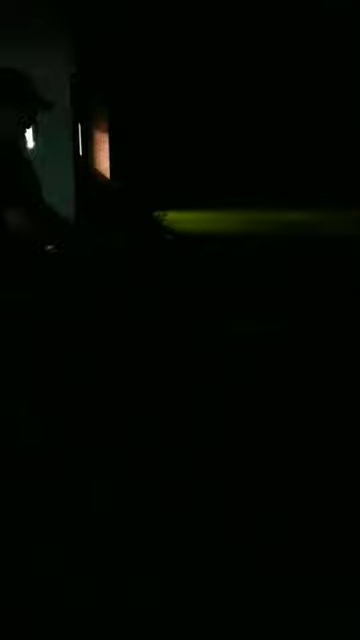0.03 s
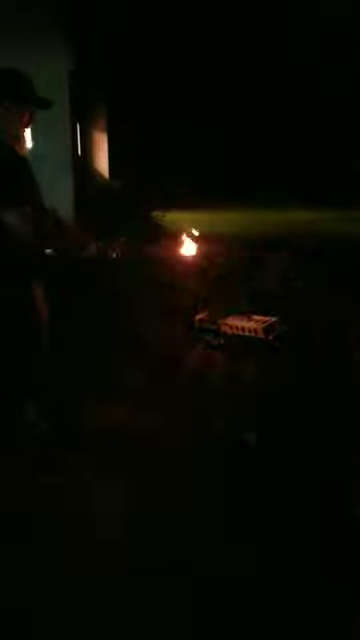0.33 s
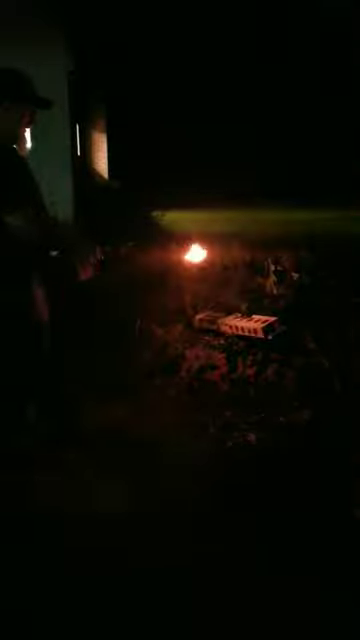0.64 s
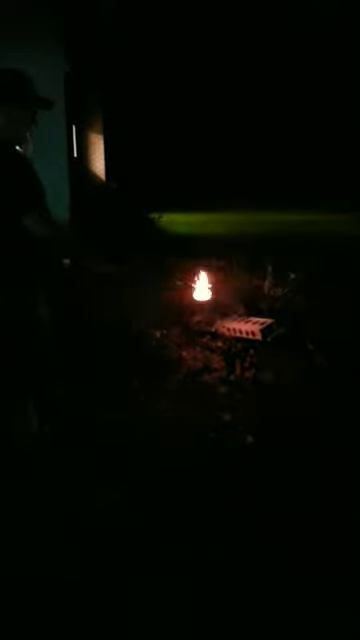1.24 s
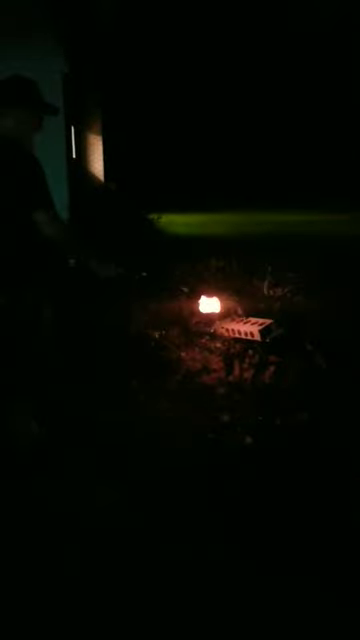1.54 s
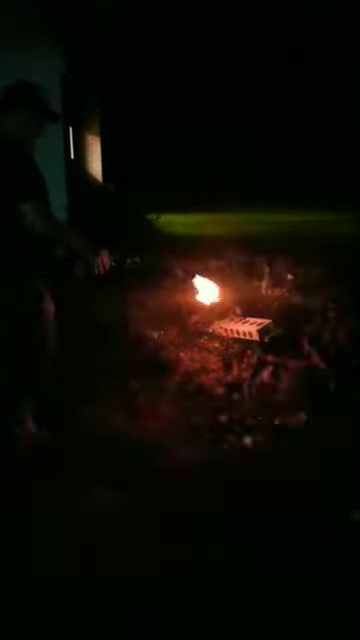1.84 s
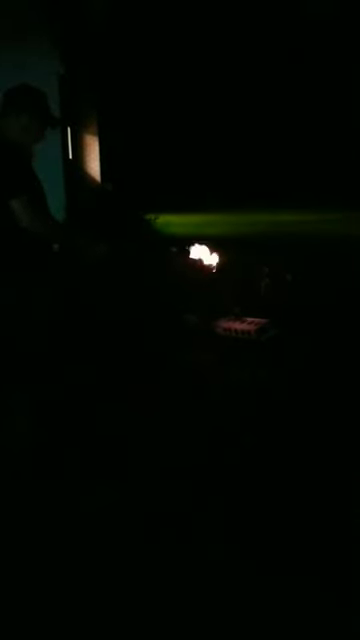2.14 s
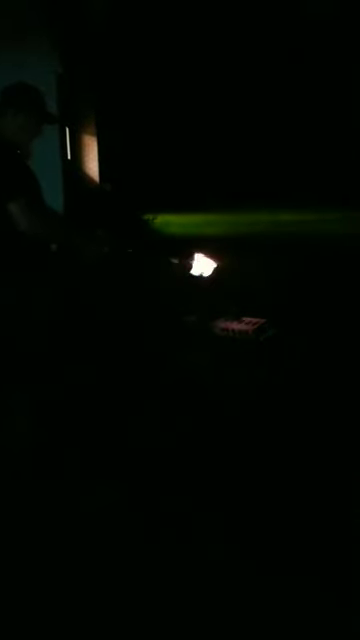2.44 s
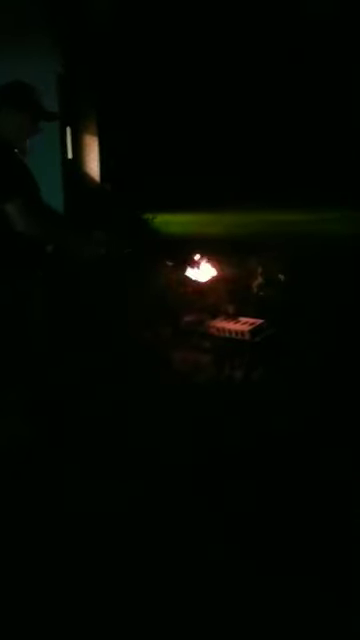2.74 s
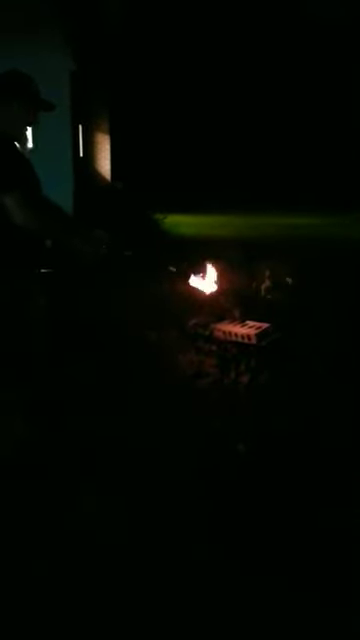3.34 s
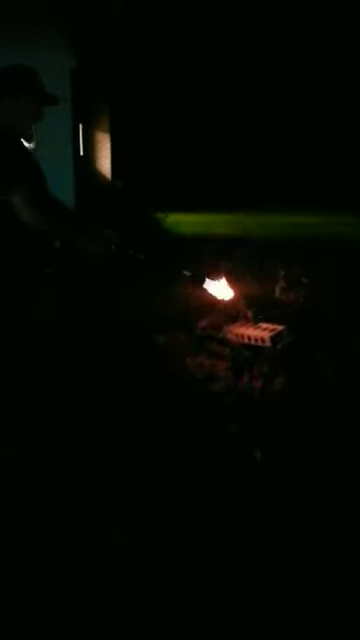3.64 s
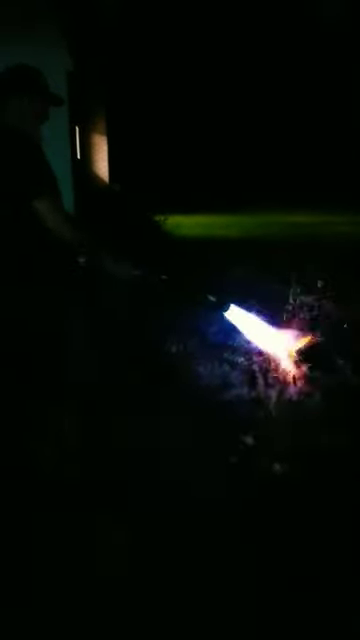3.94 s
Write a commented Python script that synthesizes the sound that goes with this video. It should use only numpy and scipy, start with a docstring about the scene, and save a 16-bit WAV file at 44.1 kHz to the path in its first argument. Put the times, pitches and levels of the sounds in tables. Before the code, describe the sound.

Gas torch snapping alight, hissing quietly and suddenly roaring, while night insects rasp.

```python
"""An igniter snaps, and a propane torch catches with a soft whump, outdoors at night. The small flame
flutters, the gas jet hisses and the burner tube hums at its resonance; a thin whistle creeps in, then
the valve opens and the flame flares into a roar. A katydid rasps two phrases of four strokes, drawing
a file over its resonant wing. A few small ticks sound nearby, over a distant insect chorus and a low
drone."""
import sys
import numpy as np
from scipy import signal
from scipy.fft import rfft, irfft, next_fast_len
from scipy.io import wavfile
from scipy.ndimage import uniform_filter1d, map_coordinates

SR = 44100
rng = np.random.default_rng(int(sys.argv[2]) if len(sys.argv) > 2 else 0)


def digitize_waveform(pressure):
    """Quantize a signal to 16-bit integers and store it at the path in sys.argv[1].

    Rows of a 2-D input are taken as channels; values are limited to [-1, 1].
    """
    field = np.atleast_2d(pressure).T
    bounded = np.clip(field, -1, 1)
    quanta = np.round(bounded * 32767).astype(np.int16)
    wavfile.write(sys.argv[1], SR, quanta)


N = 176400

# Interaural coherence of the loud and the quiet noises: f/Hz, correlation
LOUD_COHERENCE = [(100, .98), (300, .9), (480, .7), (700, .2), (1150, .8), (2400, .35), (5000, .05),
                  (12000, -.1)]
QUIET_COHERENCE = [(100, .98), (400, 0.88), (750, 0.18), (1200, 0.54), (2400, -0.13), (12000, -0.0068)]
# Their interaural level difference: f/Hz, left minus right/dB
LOUD_PAN = [(60, -0.5), (400, -1), (700, -8.5), (1250, -0.5), (2400, -8.5), (4400, -3), (10000, -0.5)]
QUIET_PAN = [(60, -1), (110, 1), (200, -1.5), (380, -3.0), (690, -10), (1280, -6.5), (2370, -8), (4360, -3),
             (8050, -3.5), (14800, 2.5)]
LOUD_FIELD, QUIET_FIELD = (LOUD_COHERENCE, LOUD_PAN), (QUIET_COHERENCE, QUIET_PAN)


def flare(churn_db=1.5, sputter_db=.75, roar_growth=1.18, gas_growth=.88, catch_s=3.837, rise_s=.0026):
    """Turbulent flow sputters and drives the tube resonance; a low roar follows as fresh gas catches."""
    # Flow noise as the valve opens: t/s, level/dB
    opening = [(3.812, -59), (3.832, -37), (3.843, -27), (3.872, -24), (3.94, -21.5), (3.96, -20),
               (4.0, -20)]
    # Spectra: f/Hz, level/dB
    roar_tone = [(25, -39.5), (50, -21), (90, -5), (135, -2), (170, 0.5), (205, -6), (235, -3),
                 (275, -11.5), (430, -7.5), (540, -11.5), (680, -18), (900, -20.5), (1300, -46),
                 (2000, -73)]
    tube_tone = [(500, -15), (930, -12.5), (1030, -0.5), (1100, -4.5), (1172, 2.5), (1230, -6.5),
                 (1320, -3.5), (1550, -17.5), (2500, -35)]
    gas_tone = [(940, -31), (1600, 0), (1730, -3.5), (2030, -1), (2870, -5), (3540, -0.5), (5620, -2),
                (6180, -5), (7250, -5.5), (11700, -4), (15300, -6)]
    flow_db = curve(opening)
    full_db = flow_db.max()
    below_db = flow_db - full_db
    caught = .5 + .5 * np.tanh((clock() - catch_s) / rise_s)
    roar_db = full_db + roar_growth * below_db - .5 + churn_db * wobble(90)
    roar = caught * amp(roar_db) * noise(roar_tone, *LOUD_FIELD)
    tube = amp(flow_db - 3.5 + .65 * wobble(120)) * noise(tube_tone, *LOUD_FIELD)
    gas_db = full_db + gas_growth * below_db - 6.5 + sputter_db * wobble(700)
    gas = amp(gas_db) * noise(gas_tone, *LOUD_FIELD)
    return (roar + tube + echoes(gas, wet_db=-1.5)) * (clock() > opening[0][0])


def idle_flame():
    """Unsteady combustion flutters and excites the tube resonance, while the turbulent jet hisses."""
    # Envelopes: t/s, relative level/dB
    flutter_levels = [(0.28, -60.5), (0.36, -55.5), (0.77, -65), (1.15, -53.5), (1.19, -59.5),
                      (1.87, -58.5), (1.9, -64), (2.32, -60), (2.43, -56), (2.49, -60.5), (2.52, -55.5),
                      (2.97, -56.5), (2.99, -58), (3.78, -57.5)]
    tube_levels = [(0.28, -80), (0.62, -78.5), (0.82, -66), (0.95, -71), (1.06, -68), (1.09, -54),
                   (1.17, -60), (1.29, -69), (1.43, -63), (1.58, -80), (1.82, -73), (2.05, -91.5),
                   (2.32, -81.5), (2.45, -62.5), (2.56, -68.5), (2.68, -62), (3.58, -63), (3.78, -59)]
    jet_levels = [(0.25, -61), (0.6, -63.5), (0.7, -60.5), (0.9, -61.5), (1.05, -62), (1.13, -65),
                  (1.6, -71), (1.8, -67), (2.0, -58), (2.28, -63), (2.4, -64), (2.6, -58.5), (3.2, -62),
                  (3.78, -62)]
    # Spectra: f/Hz, level/dB
    flutter_tone = [(25, -26), (50, -38), (85, -2.5), (130, 0), (200, -3.5), (280, -10.5), (420, -9.5),
                    (560, -18.5), (640, -16), (740, -27), (1500, -50), (4000, -36)]
    tube_tone = [(400, -40), (800, -15.5), (1000, 0), (1170, 5), (1320, -1), (1550, -11.5), (2500, -52)]
    jet_tone = [(1500, -14), (3000, -5.5), (5800, 11.5), (7200, -30), (8600, -9.5), (9600, 6.5), (10500, 0),
                (12600, 0.5), (15200, 0.5)]
    flutter = amp(curve(flutter_levels) + 2 + 1.42 * wobble(21.92)) * noise(flutter_tone, *QUIET_FIELD)
    tube = amp(curve(tube_levels) - 1 + 1.4 * wobble(25.17)) * noise(tube_tone, *QUIET_FIELD)
    jet = amp(curve(jet_levels) + 1 + .83 * wobble(30.36)) * noise(jet_tone, *QUIET_FIELD)
    return flutter + tube + echoes(jet, wet_db=-2)


def ignition(catch_s=.1868, push_hz=125, push_db=-24.5, puff_db=-36, puff_rise_s=.095, puff_t60=.17):
    """The igniter's impact rings the metal's modes; the gas catches and expands in a push and a puff."""
    # Snap and rebound: t/s, level/dB
    snaps = [(.1557, -28.5), (0.1584, -34.5)]
    # Modes of the metal: f/Hz, level/dB, t60/s
    metal_modes = [(5270, -22, .32), (11080, -34, .32), (4500, -18, .05)]
    # Spectra: f/Hz, level/dB
    snap_tone = [(700, -27.5), (1700, -2), (3000, -4), (5200, -3.5), (9000, 2.5), (11500, 6.5), (15000, -7)]
    puff_tone = [(40, 6.5), (130, 3), (250, -6), (480, -4.5), (650, -17), (900, -7.5), (1400, -23.5),
                 (3000, -36)]
    snap = sum(amp(db) * decay(s, t60=.016) for s, db in snaps) * noise(snap_tone, *LOUD_FIELD)
    strike_s, strike_db = snaps[0]
    metal = amp(strike_db) * ring(metal_modes, strike_s)
    age = clock() - catch_s
    swell = amp(puff_db - 60 * np.maximum(-age / puff_rise_s, age / puff_t60))
    push = -ring([(push_hz, push_db, .066)], catch_s)
    return scatter(snap, wet_db=-19.5, t60=.16) + metal + push + swell * noise(puff_tone, *LOUD_FIELD)


def whistle(width_hz=80):
    """A weak, fuzzy edge tone at the jet sags as the valve starts to turn."""
    # Course of the tone: t/s, f/Hz, level/dB
    course = [(2.9, 5690, -85), (3.12, 5800, -67), (3.5, 5720, -63), (3.65, 5740, -59.5), (3.82, 5580, -57)]
    pitch = curve([(s, hz) for s, hz, db in course])
    gain = amp(curve([(s, db) for s, hz, db in course])) * (clock() > course[0][0])
    phase = 2 * np.pi * np.cumsum(pitch) / SR
    tone = [wobble(2 * width_hz) * np.sin(phase) + wobble(2 * width_hz) * np.cos(phase)
            for ear in range(2)]
    return panned(unit(np.array(tone)) * gain, pan_db=-8)


def katydid(stroke_s=.115, teeth_per_s=175, speed_up=.3, jitter=.14, detune=.013, attack_s=.0003):
    """Stridulation: a file's teeth click and ring the wing; each stroke swells, quickens, then sags."""
    # Wing strokes: end t/s, level/dB
    strokes = [(.895, -46.5), (1.076, -46), (1.254, -44.5), (1.440, -45), (2.538, -46.5), (2.720, -46),
               (2.906, -47), (3.083, -44.5)]
    # Wing resonances: f/Hz, level/dB, t60/s
    wing_modes = [(2820, -19, 0.0063), (3033, -4, 0.014), (3213, -5.5, .012), (3318, -2.5, 0.027),
                  (3550, -19, .03), (3920, -31, .01), (4500, -9, 0.028), (5400, -36, .005)]
    # Spectrum of a tooth's click: f/Hz, level/dB
    click_tone = [(1400, -40), (2200, -24), (3500, -9), (5700, 14), (7200, -30), (8600, -20), (9700, 0),
                  (12000, 4.5), (15200, 6)]
    swell_s, swell_db = .045, 15.5
    sag_s, sag_share = .034, .039  # pitch drop at the end of a stroke
    rasp, clicks = np.zeros(N), np.zeros(N)
    t = np.arange(SR // 25) / SR
    even_ages = np.arange(40) / teeth_per_s
    speed = 1 + speed_up * even_ages / stroke_s
    for end, db in strokes:
        ages = np.cumsum((1 + jitter * rng.standard_normal(len(speed))) / teeth_per_s / speed)
        for age, (force, tune) in zip(ages[ages < stroke_s], rng.standard_normal((len(speed), 2))):
            size = amp(db - swell_db * max(1 - age / swell_s, 0) + 2.0 * force)
            pitch = 1 + detune * tune - sag_share * max(1 - (stroke_s - age) / sag_s, 0)
            tooth = sum(amp(level - 60 * t / t60) * np.sin(2 * np.pi * hz * pitch * t)
                        for hz, level, t60 in wing_modes)
            at = round((end - stroke_s + age) * SR)
            rasp[at:][:len(t)] += size * tooth * (1 - np.exp(-t / attack_s))
            clicks[at] += size
    treble = scatter(shaped(clicks, click_tone), wet_db=6, t60=.07)
    return panned(scatter(rasp, wet_db=1.5, t60=.098), pan_db=-9) + treble


def ticks(crack_db=-10, crack_t60=.0083):
    """Impulse response of something small: a crack and a few quickly damped modes, without bass."""
    # Ticks: t/s, level/dB, f/Hz, t60/s
    events = [(.417, -36.5, 1960, 0.037), (1.488, -47, 2160, .02), (1.8325, -35, 2420, 0.013),
              (2.936, -41.5, 1680, 0.018)]
    # Modes: frequency ratio, level/dB, t60 ratio
    mode_ratios = [(.88, -12, 0.65), (1, -3.5, 0.82), (1.14, -9.5, 0.84), (1.42, -18, .5)]
    # Filter: f/Hz, gain/dB
    tone = [(500, -20), (1100, -18), (1600, -1.5), (3000, 1), (6000, -5), (14000, -9)]
    strikes = np.zeros(N)
    for start, db, hz, t60 in events:
        modes = [(ratio * hz, level, share * t60) for ratio, level, share in mode_ratios]
        crack = amp(crack_db) * decay(start, crack_t60) * rng.standard_normal(N)
        strikes += amp(db) * (ring(modes, start) + crack)
    return panned(scatter(shaped(strikes, tone), wet_db=-7, t60=.063), pan_db=-12)


def insect_chorus(level_db=-55, drift_db=.5, shimmer_db=.36, patchy_db=2.1):
    """Many far insects add incoherently into a rasping band of noise whose voices come and go."""
    # Spectrum: f/Hz, level/dB
    tone = [(700, -17), (1400, -19.5), (1750, -12), (2050, -1), (2270, 1.5), (2550, -2.5), (2900, 0),
            (3700, -11), (4500, -2.5), (4950, -6), (5400, -8), (6200, -11), (7200, -24), (9000, -54)]
    # Slow swell: t/s, gain/dB
    swell = [(.2, .5), (.7, -1.1), (1.1, -0.5), (1.3, 1), (1.6, -1.1), (1.85, -1), (2.1, 1), (2.38, -1.5),
             (2.7, 0), (3.3, 0.4), (3.8, -1.5)]
    spectrogram = signal.stft(noise(tone, *QUIET_FIELD), nperseg=512)[2]
    voices = uniform_filter1d(rng.standard_normal(spectrogram.shape[1:]), size=4, axis=0)
    voices = uniform_filter1d(voices, size=24, axis=1)  # patches in frequency and time
    chorus = signal.istft(spectrogram * amp(patchy_db * unit(voices)), nperseg=512)[1][:, :N]
    return amp(level_db + curve(swell) + drift_db * wobble(12) + shimmer_db * wobble(300)) * chorus


def drone(pitch_hz=66.7, wander_hz=3.66, swing_db=2.1, hum_db=-58, rumble_db=-55.5):
    """A far low tone, randomly modulated in frequency and amplitude, in a bed of rumble."""
    # Rumble spectrum: f/Hz, level/dB
    tone = [(25, -11), (45, -21), (57, 7), (66, 5), (76, 0.5), (100, -2.5), (250, -55)]
    hum = np.sqrt(2) * np.sin(2 * np.pi * np.cumsum(pitch_hz + wander_hz * wobble(14)) / SR)
    swing = amp(swing_db * wobble(8.3))
    return swing * (amp(hum_db) * hum + amp(rumble_db) * noise(tone, *QUIET_FIELD))


def echoes(x, wet_db, spread_s=.06):
    """Comb filtering: sparse reflections from ground and walls interfere differently at each ear."""
    delays, sizes = spread_s * rng.random((2, 12)), rng.standard_normal((2, 12))
    response = np.array([np.bincount((delay * SR).astype(int), size / np.linalg.norm(size), SR // 4)
                         for delay, size in zip(delays, sizes)])
    return x + amp(wet_db) * signal.fftconvolve(x, response, axes=1)[:, :N]


def scatter(x, wet_db, t60):
    """Diffuse reflection from walls and ground adds a short tail, different at each ear."""
    tail = (rng.standard_normal((2, N)) * decay(0, t60))[:, :SR // 2]
    tail /= np.linalg.norm(tail[0])
    return x + amp(wet_db) * signal.fftconvolve(np.atleast_2d(x), tail, axes=1)[:, :N]


def noise(tone, coherence, pan):
    """Partly coherent stereo noise, mixed from mid and side; the mean of the channels has rms 1."""
    def response(hz):
        angle = np.arccos(np.clip(along(coherence, hz), -1, 1)) / 2
        return amp(along(tone, hz)) * [np.cos(angle), np.sin(angle)] / np.maximum(np.cos(angle), .5)
    mid, side = filtered(rng.standard_normal((2, N)), response)
    pair = filtered(np.array([mid + side, mid - side]), lambda hz: panned(1, along(pan, hz)))
    return pair / pair.mean(0).std()


def ring(modes, start):
    """Free vibration: a sum of damped modes struck at start."""
    age = clock() - start
    return sum(amp(db) * decay(start, t60) * np.sin(2 * np.pi * hz * age) for hz, db, t60 in modes)


def decay(start, t60):
    """Sudden onset, then exponential decay by 60 dB in t60."""
    age = clock() - start
    return (age >= 0) * amp(-60 * np.maximum(age, 0) / t60)


def panned(x, pan_db):
    """Interaural level difference; positive leans left."""
    return x * amp(np.array([[.5], [-.5]]) * pan_db)


def shaped(x, tone):
    """Filter by (f/Hz, gain/dB) points."""
    return filtered(x, lambda hz: amp(along(tone, hz)))


def filtered(x, response):
    """Linear filtering: the spectrum times a frequency response."""
    size = next_fast_len(N + SR // 2)
    return irfft(rfft(x, size) * response(np.fft.rfftfreq(size, 1 / SR)), size)[..., :N]


def wobble(rate):
    """A smooth random curve, rate knots a second."""
    return map_coordinates(rng.standard_normal(int(N * rate / SR) + 4), [clock() * rate], mode="nearest")


def curve(rows):
    """Linear interpolation of (t/s, value) points."""
    return np.interp(clock(), *np.transpose(rows))


def along(points, hz):
    """Interpolation of (f/Hz, value) points on a log axis."""
    freqs, values = np.transpose(points)
    return np.interp(np.log(hz + 1), np.log(freqs + 1), values)


def clock():
    """Time of each sample in seconds."""
    return np.arange(N) / SR


def unit(x):
    """Scale to rms 1."""
    return x / np.sqrt(np.mean(x ** 2) + 1e-20)


def amp(db):
    """Decibels to amplitude ratio."""
    return 10 ** (np.asarray(db) / 20)


def scene():
    """Superposition of torch, insects and night air."""
    torch = idle_flame() + whistle() + flare() + ignition()
    return torch + katydid() + ticks() + insect_chorus() + drone()


def record(dry):
    """A gate gives a brief opening silence; an ideal low-pass limits the band."""
    start_s, top_hz = .139, 15500
    return filtered(dry * (clock() > start_s), lambda hz: hz < top_hz)


dry = scene()
out = record(dry)
digitize_waveform(out)
```